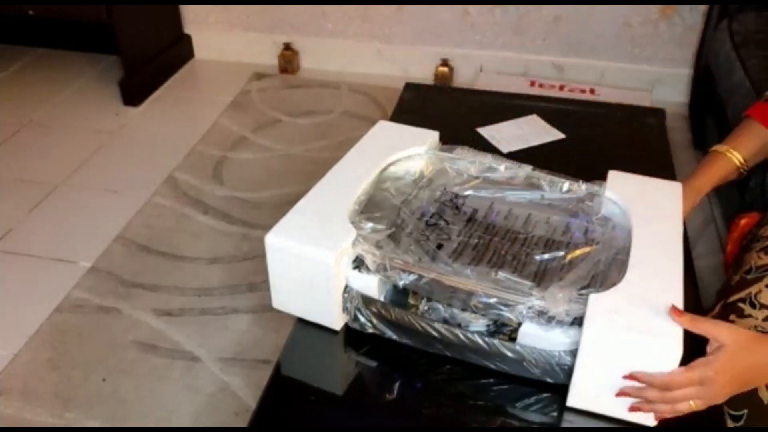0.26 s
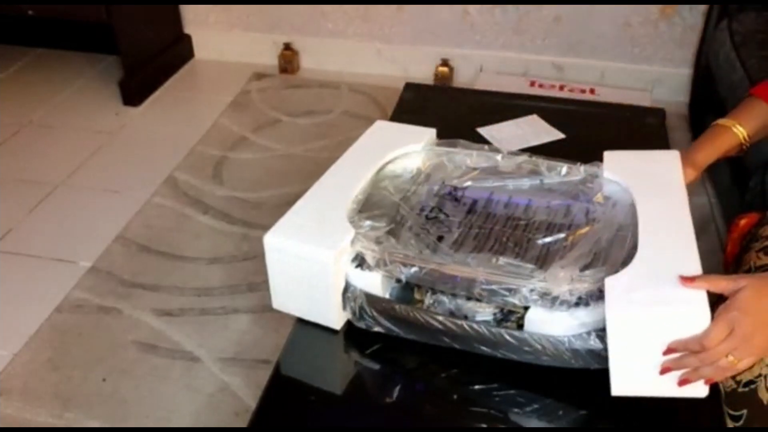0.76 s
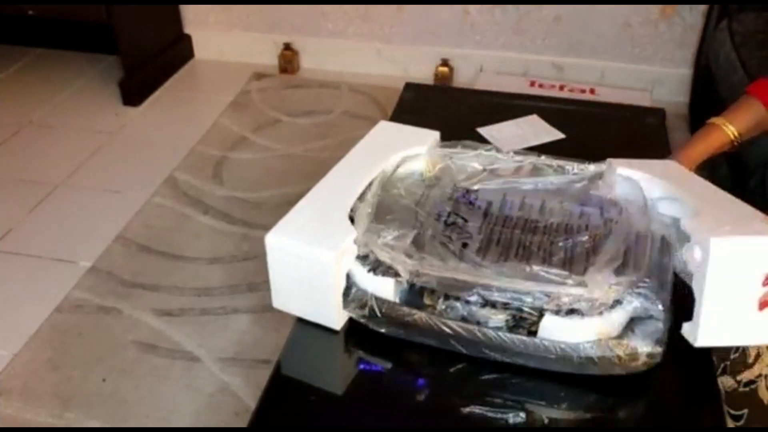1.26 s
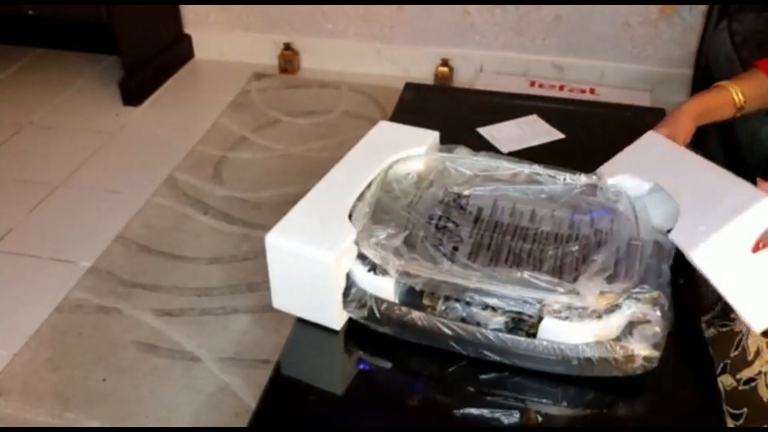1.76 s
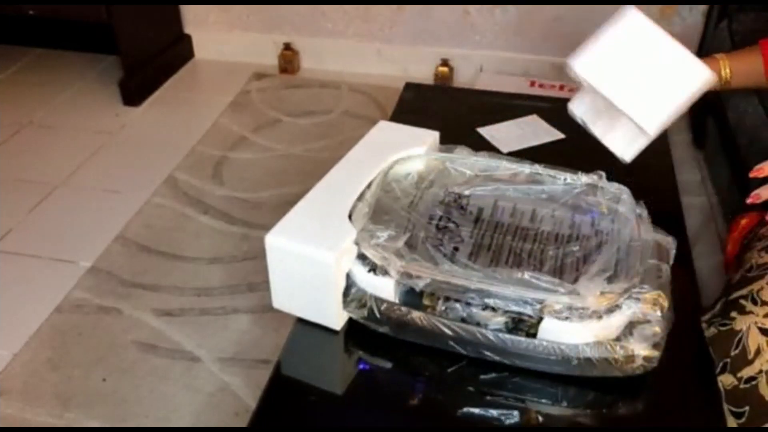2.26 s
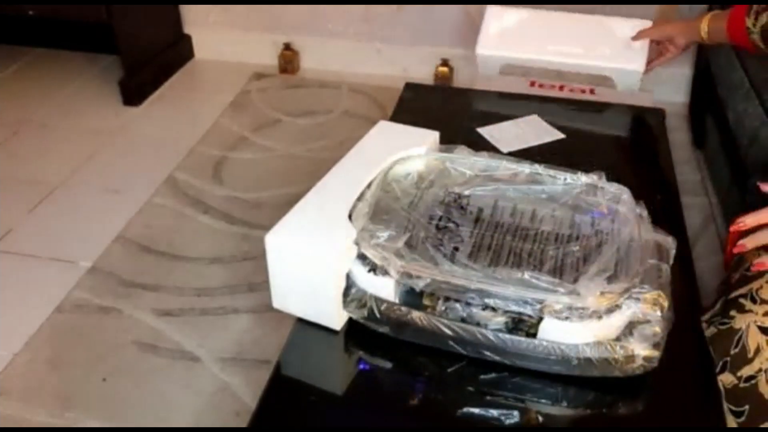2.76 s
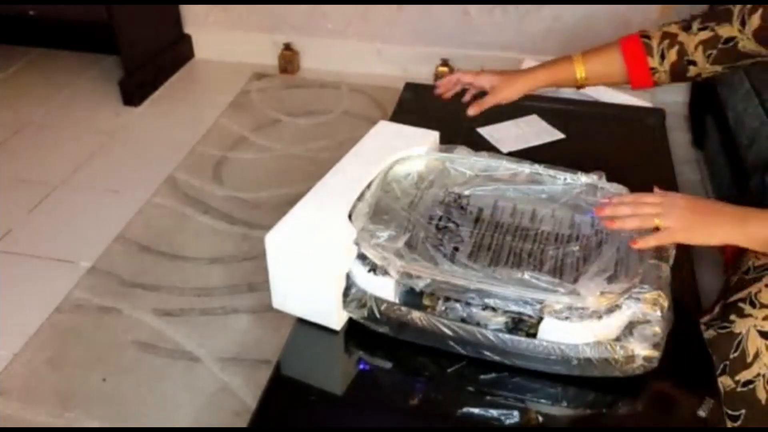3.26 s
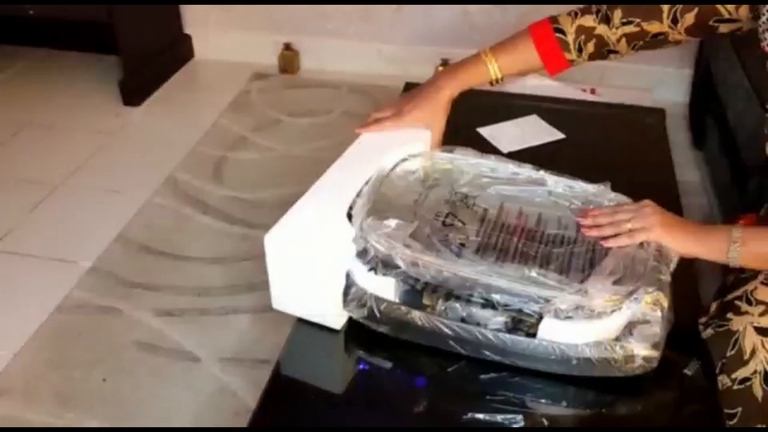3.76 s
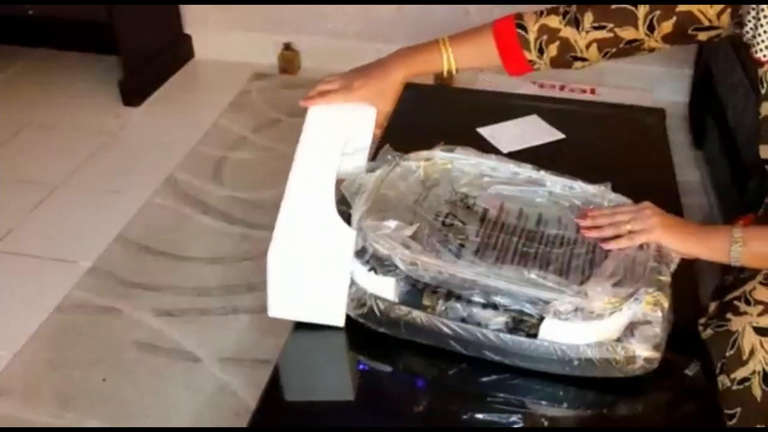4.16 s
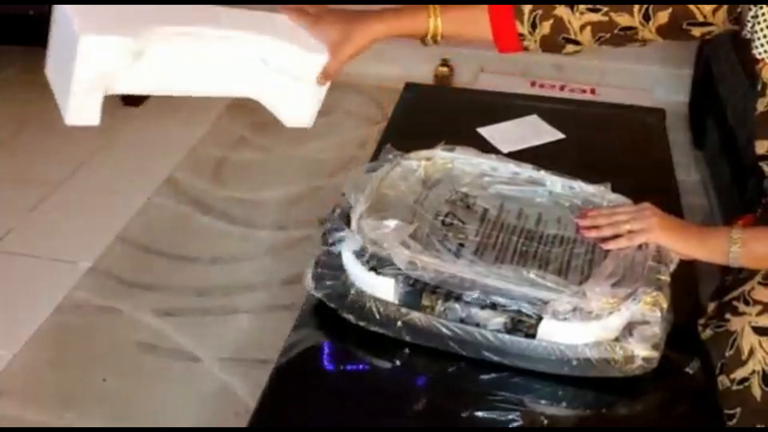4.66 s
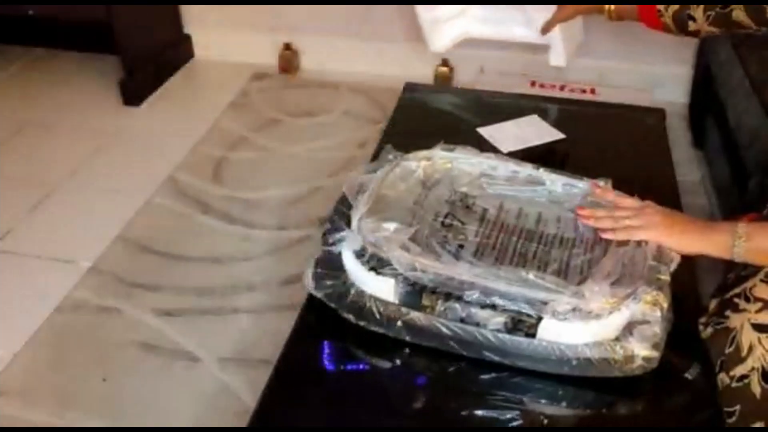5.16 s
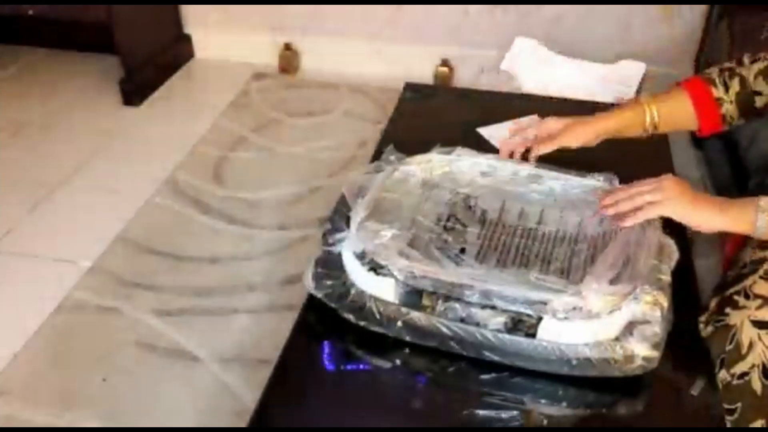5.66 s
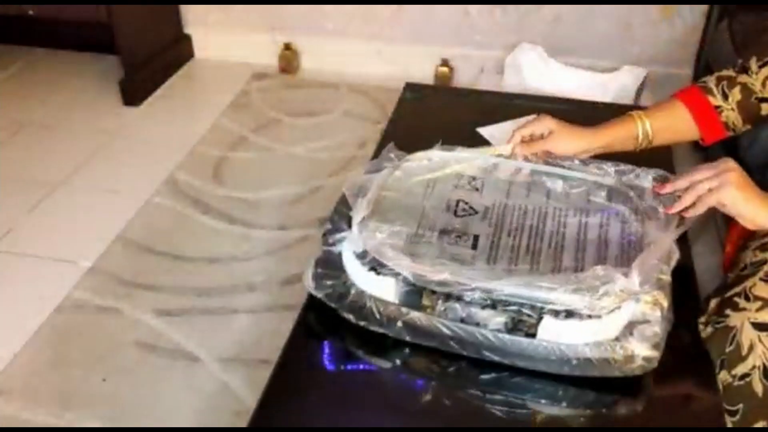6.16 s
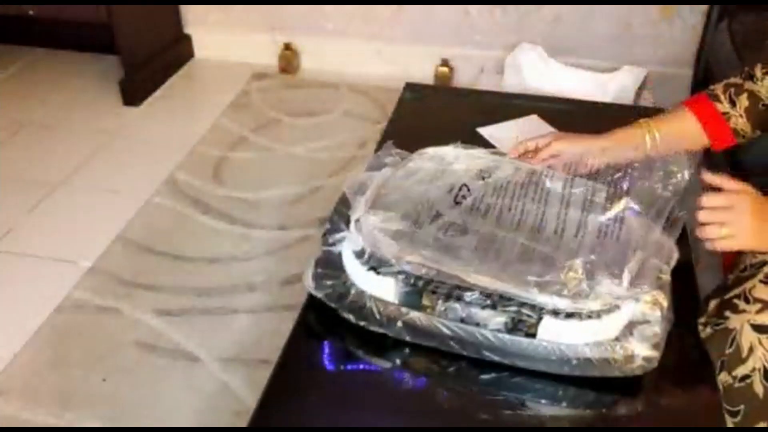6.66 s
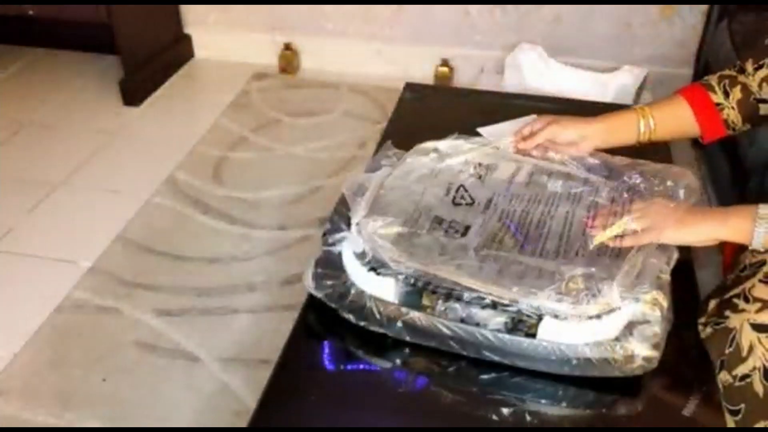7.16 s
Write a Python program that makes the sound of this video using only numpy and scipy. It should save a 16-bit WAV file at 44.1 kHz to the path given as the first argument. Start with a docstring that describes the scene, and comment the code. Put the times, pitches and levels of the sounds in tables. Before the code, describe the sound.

Close stereo pickup of packing foam rubbing against crinkly plastic, with small dry clicks and a short, lively room echo. An early squeak and scuffs lead to a hollow double knock as the first block is put down. Brisk rustling frees the second, which lands with the loudest thump. Thin film then crackles lightly over quiet low rumble and hum.

```python
"""A low rumble with a wavering motor hum comes first, then foam rubs over plastic film: two foam packing
blocks are eased off a film-wrapped appliance on a table in a hard, tiled room.
The film rustles and snaps (shaped noise and tiny clicks), the foam scuffs (noise bursts) and squeaks once
(a rising whistle). Blocks knock hollowly on the floor (ringing tones and short noise cracks)."""
import sys
import numpy as np
from scipy import signal
from scipy.fft import rfft, irfft, next_fast_len
from scipy.io import wavfile
from scipy.ndimage import uniform_filter1d

SR = 44100
rng = np.random.default_rng(int(sys.argv[2]) if len(sys.argv) > 2 else 0)


def transcribe(signal):
    """Save signal, clipped to [-1, 1], as a 16-bit WAV file at the path in sys.argv[1]."""
    frames = np.atleast_2d(signal).T
    limited = np.clip(frames, -1, 1)
    pcm = np.round(limited * 32767).astype(np.int16)
    wavfile.write(sys.argv[1], SR, pcm)


def makeup_ratio(level_db):
    """Linear amplitude ratio for a level in decibels (20 dB per factor of ten)."""
    decades = np.asarray(level_db, float) / 20
    return 10 ** decades


N = 327222   # length in samples

# Levels in the tables are those before the parts are mixed.
# Colour of the low rumble: f/Hz, level/dB
RUMBLE_COLOUR = [(15, -32), (25, 13.5), (56, -6), (97, -1), (157, -20), (201, 2.5), (271, -15.5), (334, -5),
                 (579, -17.5), (728, -23.5), (1260, -29.5), (4350, -35.5), (6000, -38.5), (7800, -77),
                 (13200, -120)]
# Tones of the motor hum: f/Hz, rms level before wavering/dB
HUM_TONES = [(47.3, -55), (94.6, -84), (142, -64), (189, -62.5)]
# How long the echo of the room takes to fall by 60 dB: f/Hz, time/s
ROOM_DECAY = [(100, 1), (300, 0.47), (1000, 0.52), (3000, 0.33), (8000, 0.3), (14000, 0.34)]
# How alike left and right noise are, 1 = the same, below 0 = opposed: f/Hz, likeness
LEFT_RIGHT_LIKENESS = [(60, 0.62), (110, 1), (180, 0.97), (300, 0.84), (600, 0.47), (1200, -0.034),
                       (2400, 0.008), (4800, -0.33), (7000, 1), (14000, 0.97)]
# Balance of the two channels: f/Hz, left over right/dB
CHANNEL_BALANCE = [(60, 0.5), (180, 0.5), (540, 0.0), (1620, 0), (4840, -2.5), (14500, -2)]
# Phase between the two channels: f/Hz, lead of the left/rad
CHANNEL_PHASE = [(300, 0.18), (690, -0.07), (1380, -2), (3360, -1.5), (6290, -5.5), (15000, -6)]
# Blows of a block: t/s, thud level/dB, lowest f/Hz, highest f/Hz, crack level/dB
BLOCK_BLOWS = [(1.204, -38.5, 150, 500, -29.5), (1.825, -38.5, 130, 700, -49), (3.008, -24, 81, 322, -30),
               (3.097, -15.5, 316, 780, -29.5), (3.112, -15.5, 310, 560, -46),
               (3.386, -60.5, 500, 900, -61), (3.892, -27.5, 141, 430, -25.5),
               (4.244, -43.5, 150, 400, -42), (4.298, -25, 166, 388, -54), (5.463, -22, 144, 368, -43),
               (5.508, -11, 150, 420, -19.5), (5.511, -27, 600, 1080, -22.5),
               (5.832, -28.5, 194, 700, -28.5), (5.834, -25, 1070, 1780, -45),
               (6.118, -46.5, 536, 700, -63), (6.158, -50, 550, 720, -60), (7.388, -46, 203, 520, -35)]
# Tones of the room that a blow sets ringing: f/Hz, level against the blow/dB, 60 dB decay/s
ROOM_TONES = [(46, 1, 0.23), (62.7, -6, 0.28), (84, -38, 0.56), (98.6, -1.5, 0.11), (152, -3.5, 0.064),
              (170, -15, 0.18), (206.7, -1.5, 0.089), (240.7, -14.5, 0.23), (281, -6, 0.056),
              (315.2, 0, 0.072), (351.5, -5, 0.1), (379.7, -6, 0.074), (431.5, -8, 0.046),
              (474.4, -3, 0.057), (544, -4.5, 0.043), (600, -2, 0.026), (646, -4, 0.057),
              (700, -2.5, 0.033), (777, -8, 0.052), (842, -9.5, 0.046), (990, -8, 0.029), (1112, 0, 0.014),
              (1230, -6, 0.024), (1487, -11, 0.027), (1640, -19, 0.036)]
# Steps of the squeak, each held until the next: t/s, starting f/Hz, level/dB
SQUEAK_STEPS = [(.539, 5800, -50), (.5475, 6500, -37), (0.557, 7040, -32.5), (0.567, 8100, -33.5)]
# Foam scuffing suddenly as it breaks loose or lands:
# t/s, rough peak level/dB, left over right/dB, 60 dB decay/s, tilt/(dB per octave)
FOAM_SCUFFS = [(0.1835, -42.5, -10, 0.079, 8), (0.978, -33, -1, 0.059, 6.5), (1.2687, -33, 1, 0.056, 4.5),
               (1.7972, -18.5, -3.5, 0.15, 15.5), (3.9245, -28.5, -9, 0.4, 0.5),
               (4.2445, -33, 5, 0.051, -7), (4.881, -47.5, -16, 0.068, 5.5),
               (5.5113, -14.5, -0.5, 0.23, -8)]
# Film snaps: t/s, rough peak level/dB, left over right/dB, tilt/(dB per octave)
FILM_SNAPS = [(0.5033, -45, -2.5, 1.5), (0.7696, -51, 2, 4), (0.8675, -48, -7, 5), (0.9043, -34.5, -9, 18),
              (1.1216, -30, -1, 0.5), (1.1745, -33, -3.0, 11), (2.001, -37, -8, -1), (2.198, -39, -7, 8),
              (2.374, -47, -1, -1), (2.7681, -55, -13, 0), (3.5468, -47, -14, 4), (3.8606, -34.5, -3, 5),
              (3.927, -26, 8, -1), (3.931, -25, -8, -2), (4.0811, -40, -18, 5), (4.2463, -28, 1, -2),
              (5.1023, -33, 0, 4), (5.1562, -35.5, -3.0, 6), (5.875, -30, -2, 4), (5.9197, -27, 1, 7),
              (5.9753, -38, -9, 6), (6.201, -32, -4, 10), (6.313, -27, -3, 4), (6.6113, -33.5, -3.0, 7),
              (6.9033, -42, 2, 2), (7.1988, -34, -1, 2)]
# Colour of the film: f/Hz, level/dB
FILM_COLOUR = [(1500, 1), (2500, 1.5), (3400, 0), (4400, -1.5), (5700, -5), (7200, -2.5), (8400, -7.5),
               (8900, -10.5), (11000, -12), (13700, -9.5), (16000, -20.5)]
# Colour of the rubbed foam: f/Hz, level/dB
FOAM_COLOUR = [(88, -16), (150, -4.5), (377, -1.5), (415, -6), (635, -6.5), (708, -4), (1100, -10),
               (1550, -13.5), (4000, -31), (5200, -40), (8800, -120)]
# Strokes of hand and foam over the film:
# start t/s, rise/s, hold/s, film level/dB, foam above film before its common offset/dB
RUB_STROKES = [(0.175, 0.016, 0.037, -55.5, -6), (0.247, 0.026, 0.015, -56, 1),
               (0.32, .02, 0.025, -57.5, -18), (0.438, 0.065, .02, -58, -13),
               (0.566, 0.016, 0.032, -51, -6), (0.697, 0.026, 0.13, -62.5, 2),
               (0.834, 0.041, 0.016, -53.5, 0), (0.98, .03, 0.033, -48.5, -5.5),
               (1.093, 0.078, 0.11, -43, -3), (1.334, 0.026, .03, -52.5, -5),
               (1.406, 0.026, 0.12, -51.5, -1.5), (1.574, 0.065, 0.26, -48.5, -10),
               (1.792, 0.022, 0.026, -44.5, -2), (1.987, 0.0081, 0.047, -57.5, 3),
               (2.13, .06, 0.054, -55, -6), (2.36, .02, 0.041, -58.5, 0.5), (2.442, 0.04, 0.017, -58.5, 1),
               (2.73, 0.074, 0.013, -51.5, -24), (3, 0.017, 0.038, -57.5, 14.5),
               (3.082, 0.014, 0.034, -50, 13.5), (3.17, 0.025, 0.025, -57, -4),
               (3.526, 0.032, 0.14, -59.5, -28), (3.641, 0.046, 0.045, -49, -6),
               (3.763, 0.022, 0.077, -55.5, -21), (3.847, .015, 0.077, -49, -20),
               (3.91, 0.015, 0.018, -37, -22), (3.938, 0.019, 0.015, -35, -19),
               (4.066, 0.017, 0.052, -41, -6.5), (4.224, 0.015, 0.045, -38, -8.5),
               (4.296, 0.042, 0.033, -36, -12.5), (4.408, 0.033, 0.025, -42.5, -11),
               (4.5, .04, 0.044, -41, -8.5), (4.63, 0.032, 0.017, -54.5, -2),
               (4.883, 0.013, 0.079, -59.5, 0.5), (4.945, 0.06, 0.041, -56, 2),
               (5.06, .03, 0.16, -52.5, -5), (5.186, 0.043, .01, -51, -1), (5.397, .02, 0.055, -57.5, -18),
               (5.45, 0.034, .01, -47.5, -5), (5.502, 0.0089, 0.015, -41.5, 15.5),
               (5.544, 0.018, 0.013, -52.5, 15.5), (5.64, .02, 0.11, -53.5, 4),
               (5.821, .03, 0.057, -47, 1.5), (5.947, 0.026, 0.095, -46.5, -24),
               (6.04, 0.056, 0.034, -49, -16), (6.148, 0.027, 0.23, -53.5, -12),
               (6.376, 0.051, 0.062, -49.5, -24), (6.526, 0.049, 0.088, -51, -10),
               (6.671, 0.083, 0.038, -57, -11), (6.876, 0.027, 0.036, -60, -3),
               (6.976, 0.057, 0.062, -61.5, -14), (7.073, 0.055, 0.046, -54, -4),
               (7.176, 0.018, .01, -51, -15), (7.245, 0.025, 0.033, -59, -10),
               (7.274, 0.075, 0.079, -50.5, -25)]


def rms_one(x):
    """Scale a sound so that its average strength (rms) is 1."""
    return x / np.sqrt(np.mean(x ** 2) + 1e-20)


def at_hz(points, hz):
    """Read a curve between its points, with pitch on a log scale."""
    points = np.array(points)
    return np.interp(np.log(np.maximum(hz, 1)), np.log(np.maximum(points[:, 0], 1)), points[:, 1])


def colour(x, gain_at):
    """Multiply the spectrum by a gain that depends on frequency."""
    size = next_fast_len(x.shape[-1])
    hz = np.arange(size // 2 + 1) * SR / size
    return irfft(rfft(x, size) * gain_at(hz), size)[..., :x.shape[-1]]


def butter(x, order, hz, kind="low"):
    """Pass x through a filter with a smooth edge at hz."""
    return signal.sosfilt(signal.butter(order, hz, kind, fs=SR, output="sos"), x)


def stereo_noise(length):
    """A shared and an opposed noise, mixed so that left and right are as alike as the table says."""
    def alike(hz):
        return np.clip(at_hz(LEFT_RIGHT_LIKENESS, hz), -1, 1)

    mid, side = rng.standard_normal((2, length))
    mid = colour(mid, lambda hz: np.sqrt(1 + alike(hz)))
    side = colour(side, lambda hz: np.sqrt(1 - alike(hz)))
    return np.array([mid + side, mid - side]) / np.sqrt(2)


def drift(rate_hz):
    """Smoothed noise that wanders around 0 with a spread of 1, made at every 40th sample."""
    r = np.exp(-80 * np.pi * rate_hz / SR)
    white = rng.standard_normal(N // 40 + 2002)
    slow = signal.lfilter([1], [1, -2 * r, r * r], white)[2000:]   # drop the run-in
    return np.interp(np.arange(N) / 40, np.arange(len(slow)), rms_one(slow))


def room(x, gap_s=0.0036):
    """Dense reflections start after a gap, build up as long again and die octave by octave; energy 1."""
    t, white, echo = np.arange(SR) / SR, stereo_noise(SR), 0
    for hz in 31.25 * 2. ** np.arange(10):
        def octave_gain(f):
            octaves_away = np.clip(np.log2(np.maximum(f, 1) / hz), -1, 1)
            return np.cos(np.pi / 2 * octaves_away) ** 2

        t60 = at_hz(ROOM_DECAY, hz)
        echo = echo + colour(white, octave_gain) * makeup_ratio(-60 * t / t60) / np.sqrt(t60)
    echo = echo * np.clip(t / gap_s - 1, 0, 1)
    echo = echo / np.sqrt(np.sum(echo ** 2) / 2)
    return signal.fftconvolve(np.atleast_2d(x), echo, axes=1)[:, :N]


def background():
    """A low noise rumble swells and sinks slowly; the tones of the motor hum waver together in pitch."""
    rumble = rms_one(colour(stereo_noise(N), lambda hz: makeup_ratio(at_hz(RUMBLE_COLOUR, hz))))
    rumble = rumble * makeup_ratio(-53.5 + 3.66 * drift(0.7))
    cycles = np.cumsum(1 + 0.021 * drift(4.56)) / SR   # time, running unevenly
    hum = 0
    for hz, db in HUM_TONES:
        level = makeup_ratio(db + 2.0 * drift(6.2)) * np.sqrt(2)   # rms to peak of a sine
        hum = hum + level * np.sin(2 * np.pi * hz * cycles)
    return rumble + hum


def ring(clicks, hz, t60):
    """A unit click sets a sine of starting height 1 ringing; it falls by 60 dB in t60 seconds."""
    r, w = makeup_ratio(-60 / (t60 * SR)), 2 * np.pi * hz / SR
    return signal.lfilter([0, np.sin(w)], [1, -2 * r * np.cos(w), r * r], clicks + 1e-18)


def thuds(skirt_db=16):
    """A soft contact makes tones swell and ring, weaker by skirt_db per octave outside its range."""
    t, blow_db, lowest_hz, highest_hz, _ = np.transpose(BLOCK_BLOWS)
    out = 0
    for hz, tone_db, t60 in ROOM_TONES:
        octaves_below = np.maximum(np.log2(lowest_hz / hz), 0)
        octaves_above = np.maximum(np.log2(hz / highest_hz), 0)
        db = blow_db + tone_db - skirt_db * (octaves_below + octaves_above)
        clicks = np.zeros(N)
        clicks[np.round(t * SR).astype(int)] = makeup_ratio(db) * rng.choice([-1, 1], len(t))
        peak = SR * t60 / (2 * np.e * np.log(1000))   # height of the swell of a tone rung twice
        out = out + ring(ring(clicks, hz, t60), hz, t60) / peak
    return out


def cracks(crack_s=0.0046, reach=1.91, above_thud=2.6):
    """The hollow edge of each blow: a noise band, above_thud times as high at its top, peaks at crack_s."""
    length = 2000
    out, t = np.zeros(N + length), np.arange(length) / SR
    swell = t / crack_s * np.exp(1 - t / crack_s)
    for s, _, _, high_hz, db in BLOCK_BLOWS:
        top_hz = above_thud * high_hz
        crack = butter(rng.standard_normal(length), 3, [top_hz / reach, top_hz], "band")
        at = round(s * SR)
        out[at:at + length] += makeup_ratio(db) * rms_one(crack) * swell
    return out[:N]


def squeak(rough=.8, overtone_db=-2):
    """Foam sticks and slips over film ever faster: a rough whistle climbs in steps, with its octave."""
    end_s, climb_hz_per_s, blend_s = .575, 32000, 0.0062
    t = np.arange(N) / SR
    starts = np.transpose(SQUEAK_STEPS)[0]
    step = np.maximum(np.searchsorted(starts, t) - 1, 0)
    s, hz, db = np.array(SQUEAK_STEPS)[step].T
    on = (t > starts[0]) & (t < end_s)
    hz = hz + on * climb_hz_per_s * (t - s)
    level = uniform_filter1d(on * makeup_ratio(db), round(blend_s * SR) + 1)
    pitch_flutter, level_flutter = butter(rng.standard_normal((2, N)), 2, 500)
    phase = 2 * np.pi * np.cumsum(hz * (1 + 0.024 * rms_one(pitch_flutter))) / SR
    whistle = np.sin(phase) + makeup_ratio(overtone_db) * np.sin(2 * phase)
    return level * (1 + rough * rms_one(level_flutter)) * whistle


def bursts(events, crest_db, attack_s):
    """Noise coloured like the film, tilted brighter or duller, starts almost at once and dies away."""
    length = 9000
    out, t = np.zeros((2, N + length)), np.arange(length) / SR
    for s, db, pan_db, t60, tilt_db in events:
        def gain(hz):
            octaves = np.log2(np.maximum(hz, 1000) / 7000)
            return makeup_ratio(at_hz(FILM_COLOUR, hz) + tilt_db * octaves)

        burst = rms_one(colour(rng.standard_normal(length), gain))
        sides_db = pan_db / 2 * np.array([[1], [-1]])
        level = makeup_ratio(db - crest_db - 60 * t / t60 + sides_db)   # crest_db: peak over rms
        at = round(s * SR)
        out[:, at:at + length] += level * burst * np.minimum(t / attack_s, 1)
    return out[:, :N]


def scuffs():
    """Foam that breaks loose or lands rubs for a moment: a sudden noise burst."""
    return bursts(FOAM_SCUFFS, crest_db=6, attack_s=0.0021)


def snaps():
    """Film snaps: very short noise bursts with an even sharper start."""
    events = [(s, db, pan_db, 0.016, tilt_db) for s, db, pan_db, tilt_db in FILM_SNAPS]   # 0.016 s decay
    return bursts(events, crest_db=5, attack_s=0.00025)


def crackle(per_s, spread_db, hiss, flurries_per_s, flurry_s):
    """Tiny snaps of uneven size on friction hiss, in flurries that start suddenly and die away; rms 1."""
    starts = (rng.random(N) < flurries_per_s / SR) * rng.exponential(1, N)
    flurry = .8 + signal.lfilter([1], [1, -np.exp(-1 / (flurry_s * SR))], starts)
    sizes = makeup_ratio(spread_db * np.minimum(rng.exponential(1, N), 5)) * rng.choice([-1, 1], N)
    born = rng.random(N) < per_s * flurry / SR
    return rms_one(np.sqrt(flurry) * hiss * stereo_noise(N) + rms_one(sizes * born))


def strokes(levels_db, t60, resting_db):
    """Each stroke swells, holds and dies away; their powers add up over a faint resting level."""
    t, power = np.arange(N) / SR, makeup_ratio(2 * resting_db)
    for (s, rise_s, hold_s, *_), db in zip(RUB_STROKES, levels_db):
        swell = np.clip((t - s) / max(rise_s, .002), 0, 1) ** 2
        since_stop = np.maximum(t - s - rise_s - hold_s, 0)
        power = power + swell ** 2 * makeup_ratio(2 * (db - 60 * since_stop / t60))
    return np.sqrt(power)


def rustle():
    """Film crackles in the treble, with a sheen above 9500 Hz; the rubbed foam adds a duller body."""
    film_db, foam_db = np.transpose(RUB_STROKES)[3:]
    film = crackle(1200, spread_db=3.0, hiss=1.0, flurries_per_s=25, flurry_s=.03)
    film = colour(film, lambda hz: makeup_ratio(at_hz(FILM_COLOUR, hz)))
    low = rms_one(butter(film, 4, 9500))
    sheen = rms_one(butter(film, 4, 9500, "high"))
    foam = crackle(1500, spread_db=5.5, hiss=1.9, flurries_per_s=17, flurry_s=.04)
    foam = rms_one(colour(foam, lambda hz: makeup_ratio(at_hz(FOAM_COLOUR, hz))))
    # harder strokes gain less sheen than film; more foam body brings a little more sheen
    usual_db = -44
    sheen_db = usual_db - 10 + .8 * (film_db - usual_db) + 0.033 * foam_db
    return (strokes(film_db, t60=0.53, resting_db=-79) * low
            + strokes(sheen_db, t60=0.34, resting_db=-84) * sheen
            + strokes(film_db + foam_db + 4.5, t60=0.49, resting_db=-57) * foam)


def scene():
    """Near sounds keep their direct part; blows on the floor are mostly room."""
    near = rustle() + snaps() + scuffs()
    whistle, thud, crack = squeak(), thuds(), cracks()
    whistle_sides = makeup_ratio([[-1.5], [1.5]])   # a little to the right
    direct = near + whistle * whistle_sides + makeup_ratio(-5.5) * thud + makeup_ratio(-11.5) * crack
    wet = makeup_ratio(-7) * near.mean(axis=0) + makeup_ratio(-1.5) * whistle + makeup_ratio(-3) * thud + makeup_ratio(-6.0) * crack
    return direct + room(wet) + background()


def top_cut(x):
    """Nothing passes above the cut-off."""
    return signal.sosfilt(signal.butter(12, 15110, fs=SR, output="sos"), x)


def record(dry):
    """Two channels differ a little in level and phase by pitch; deep bass and top treble are cut."""
    def half_difference(hz):
        level = at_hz(CHANNEL_BALANCE, hz) * np.log(10) / 20   # dB to natural log
        halves = np.array([[.5], [-.5]])
        return np.exp((level + 1j * at_hz(CHANNEL_PHASE, hz)) * halves)

    channels = butter(colour(dry, half_difference), 3, 34, "high")
    steep_cut = signal.ellip(10, .5, 60, 14260, fs=SR, output="sos")   # ripple dB, depth dB, edge Hz
    mix = signal.sosfilt(steep_cut, channels)
    return top_cut(mix)


dry = scene()
out = record(dry)
transcribe(out)
```